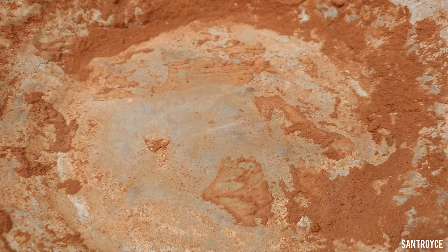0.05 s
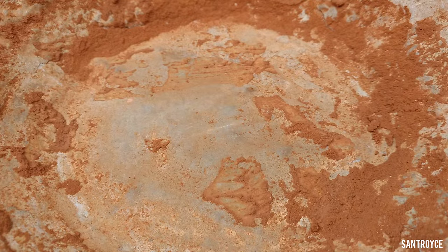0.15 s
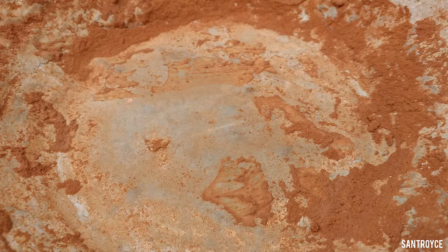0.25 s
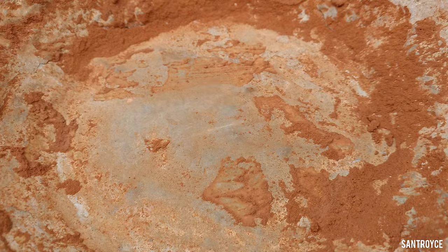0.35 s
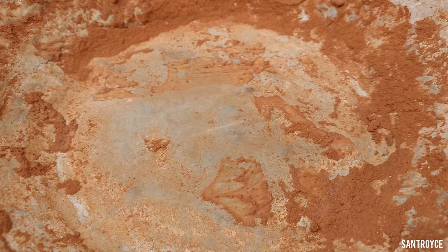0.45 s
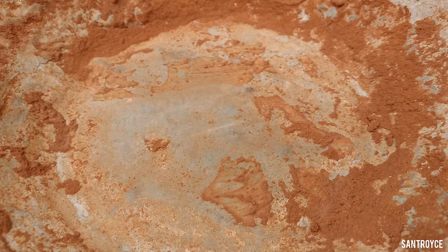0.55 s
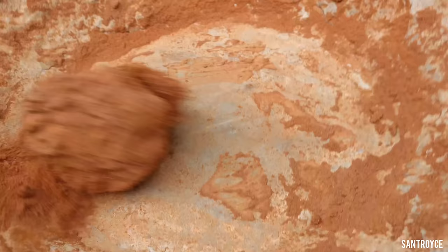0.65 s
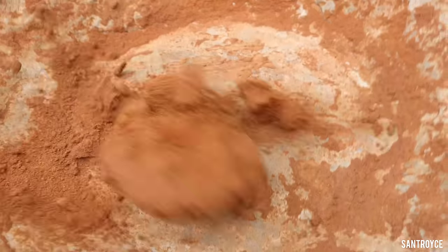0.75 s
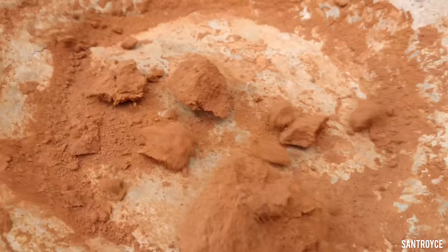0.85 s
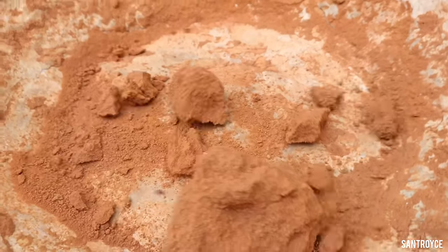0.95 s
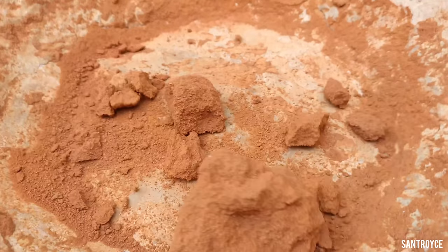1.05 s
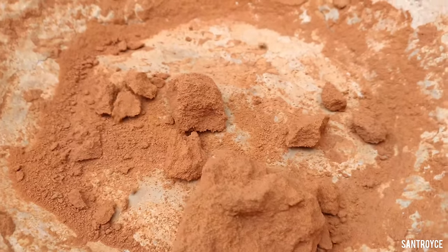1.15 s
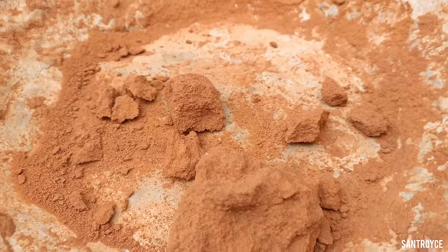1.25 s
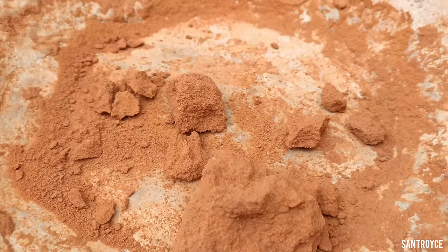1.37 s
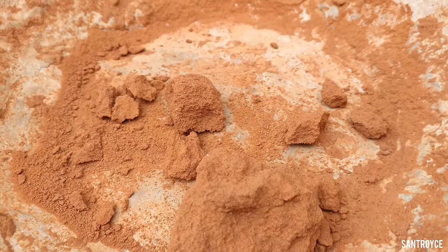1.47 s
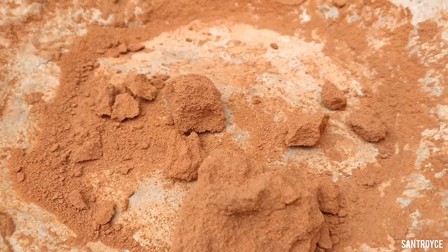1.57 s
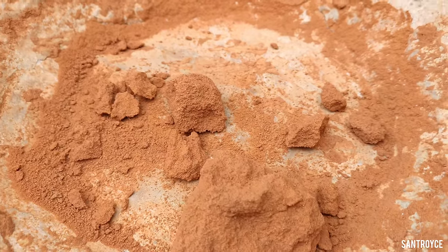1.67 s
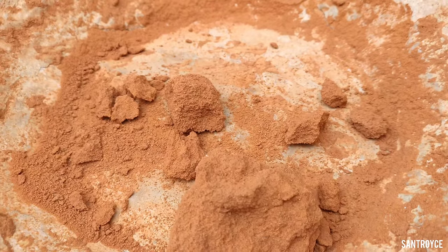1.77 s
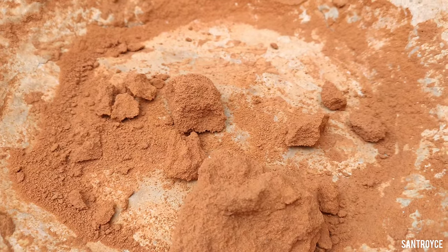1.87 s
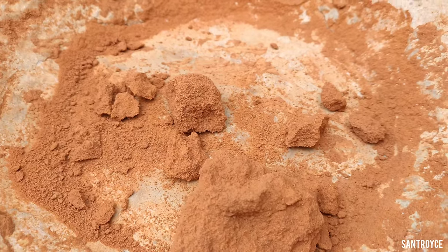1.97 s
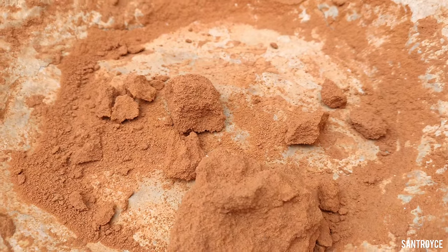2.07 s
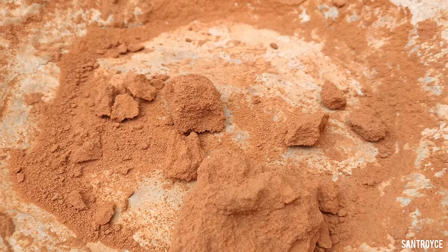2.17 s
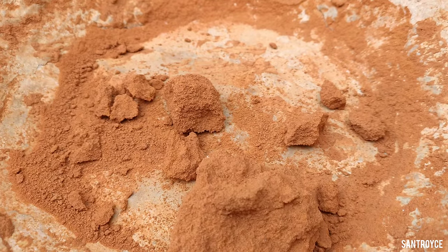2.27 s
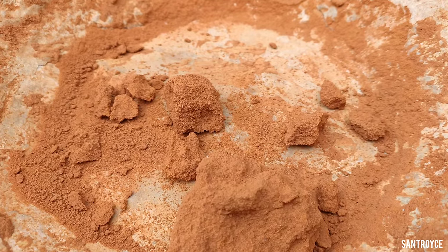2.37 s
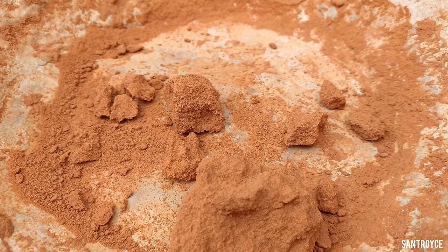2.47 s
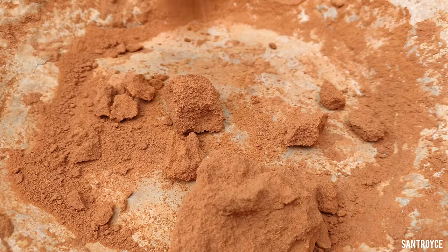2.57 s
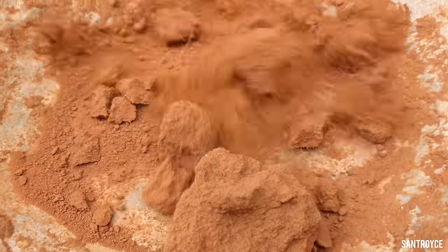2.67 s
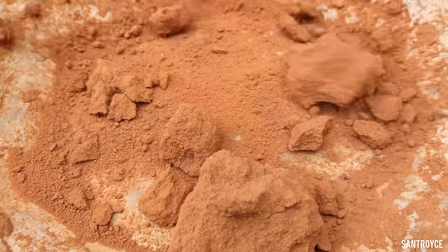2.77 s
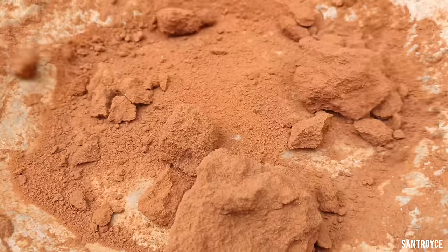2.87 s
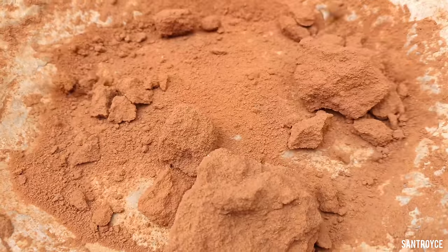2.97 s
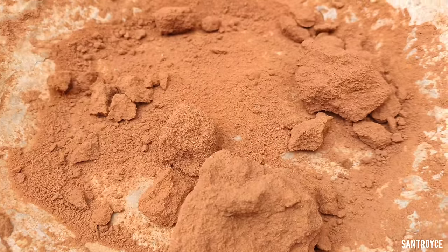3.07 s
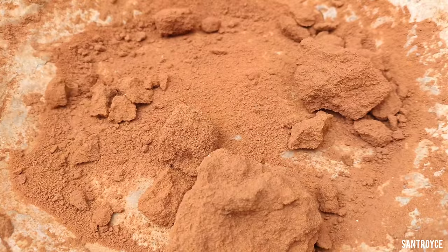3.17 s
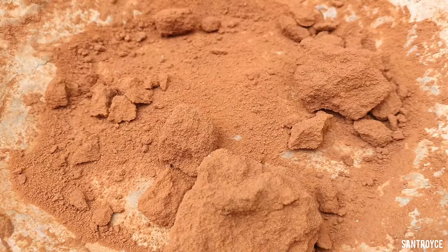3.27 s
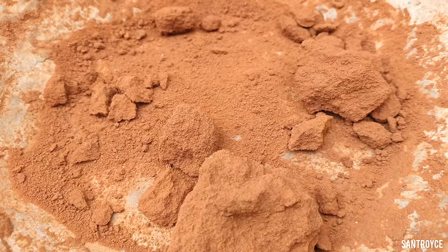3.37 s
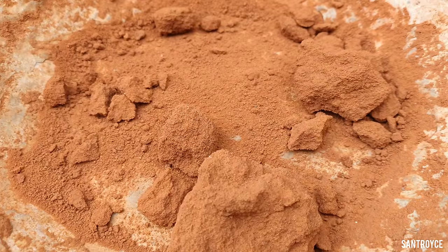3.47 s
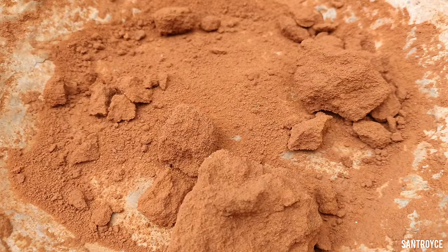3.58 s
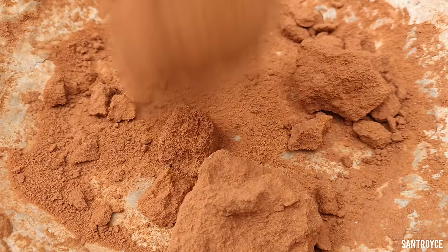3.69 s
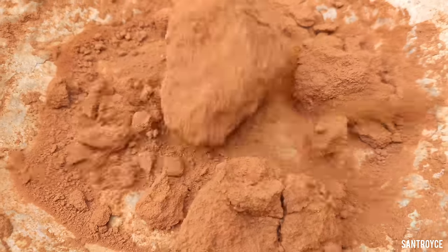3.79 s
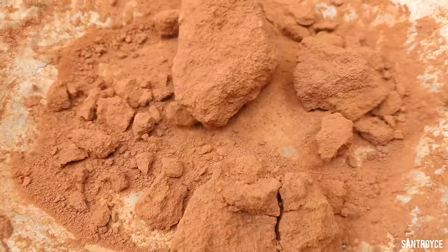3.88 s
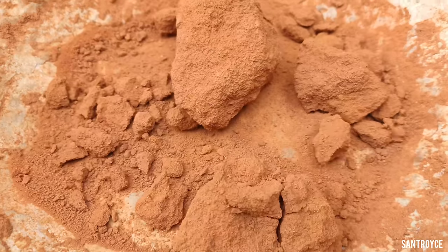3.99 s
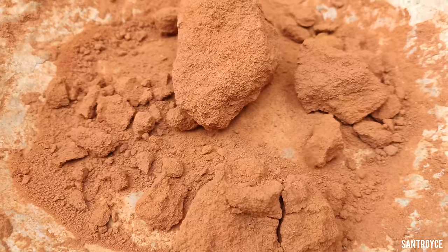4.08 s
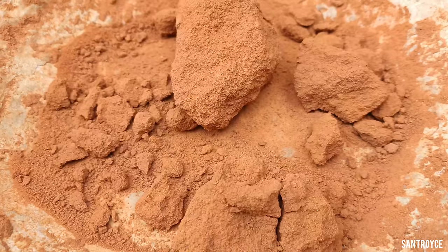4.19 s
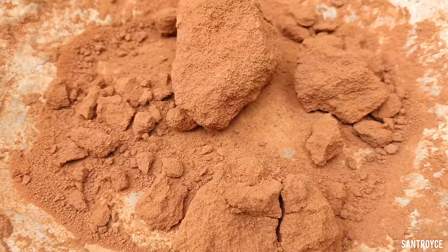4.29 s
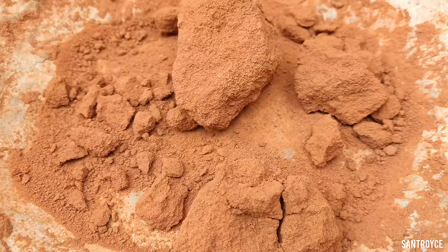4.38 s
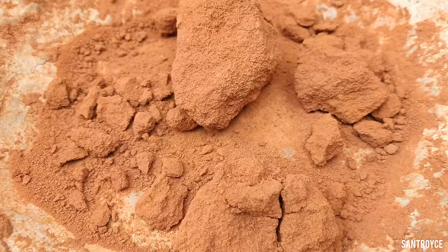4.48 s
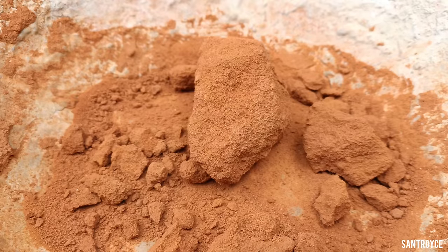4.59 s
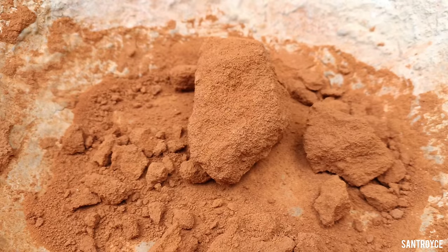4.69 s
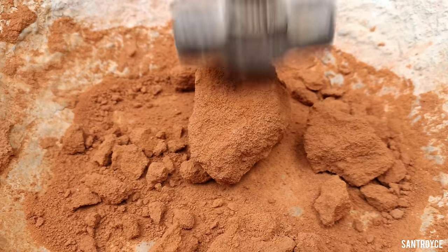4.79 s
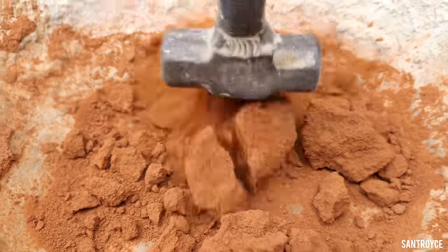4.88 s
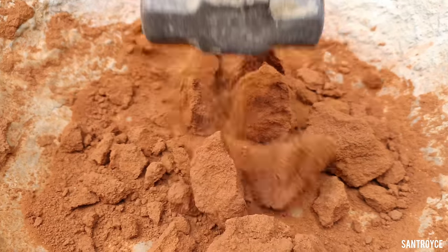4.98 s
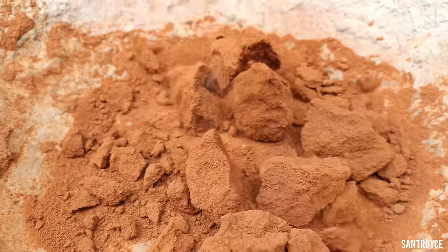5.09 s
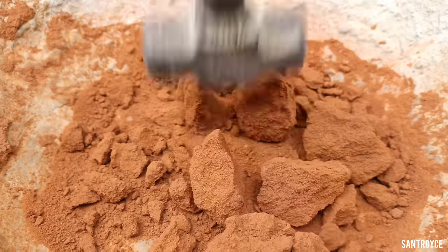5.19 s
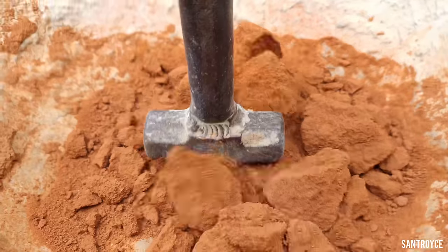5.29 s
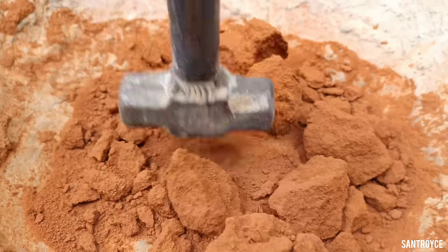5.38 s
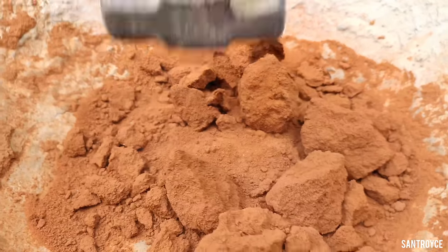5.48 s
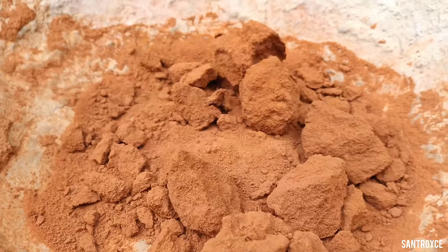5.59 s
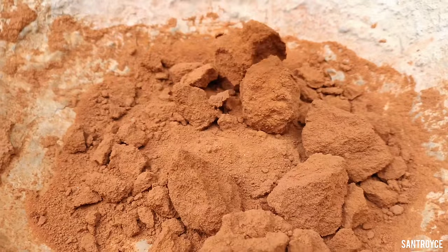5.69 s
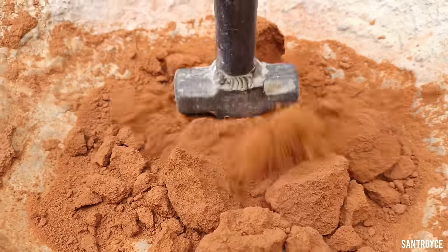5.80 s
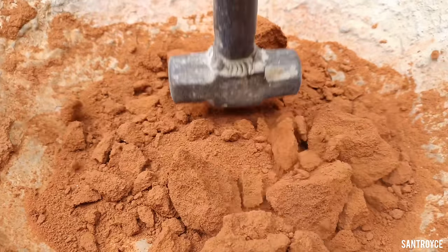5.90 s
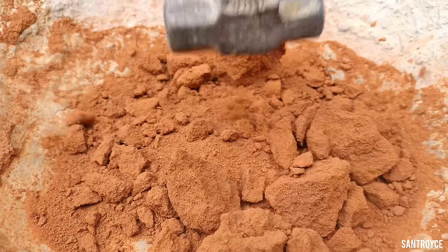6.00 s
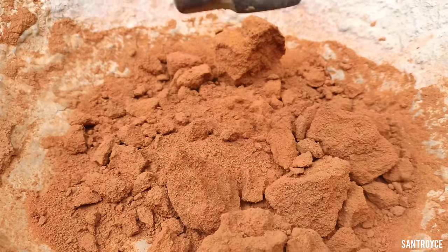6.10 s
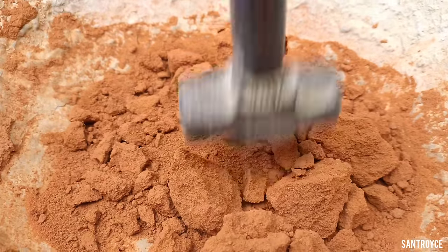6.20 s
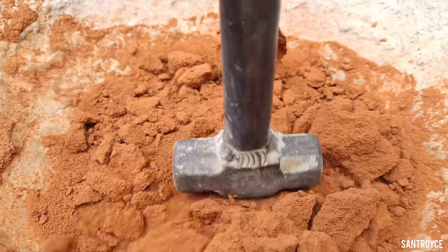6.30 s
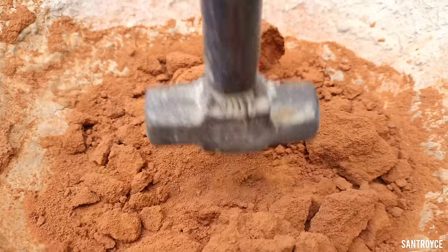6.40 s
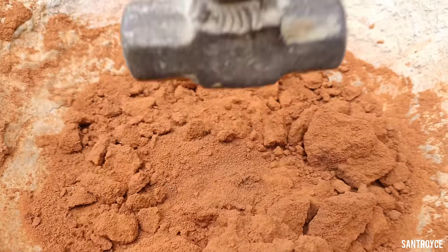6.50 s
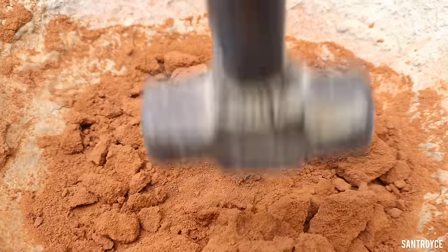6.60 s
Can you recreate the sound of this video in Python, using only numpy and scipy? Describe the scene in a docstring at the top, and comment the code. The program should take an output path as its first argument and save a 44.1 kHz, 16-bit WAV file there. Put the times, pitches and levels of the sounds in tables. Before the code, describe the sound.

Quiet outdoor air with insects, distant traffic and a faint whistle opens the scene, heard close to the ground. At 0.75 s a dry clay lump hits stone with a hard, brittle crack, scattering grains; pieces bump and rock with low hollow thumps until about 1.95 s. From about 0.75 to 2 s a songbird repeats a rapid, bright, echoing trill nine times. The air then turns quieter, with faint coos and a very low hum. Another lump smacks down at 2.7 s, spilling grit, and a heavier one at 3.8 s with a low heave. A second bird gives sliding whistles around 3.7 and 4.2-4.4 s. Hammer blows crush the clay at about 4.95, 5.35, 5.87 and 6.35 s: dull, cushioned crunches with small cracks, knocks and hissing powder, fading by 6.65 s. The background dips very briefly four times.

```python
"""Insects and distant traffic lie under faint whistles and coos; the level dips briefly four times.
Lumps of dry clay, sums of slab modes driven by noisy cracks, drop on stone and rock to rest as a
songbird trills nine times in echoing sines. Quieter air and a low hum take over; hammer blows crush
the clay, amid small cracks and hissing powder made of random grains, with some low heaves.
Amid the blows a second bird whistles gliding sines, the rising ones rich in overtones."""
import sys
import numpy as np
from scipy import signal
from scipy.fft import rfft, irfft, next_fast_len
from scipy.io import wavfile
from scipy.ndimage import uniform_filter1d

SR = 44100
rng = np.random.default_rng(int(sys.argv[2]) if len(sys.argv) > 2 else 0)


def master(y):
    """Save y as 16-bit WAV."""
    cut = np.clip(np.atleast_2d(y).T, -1, 1)
    pcm = np.round(cut * 32767)  # scale
    wavfile.write(sys.argv[1], SR, pcm.astype(np.int16))


N = 293265

# slab modes: pitch_hz, level_db, t60_s (at damping 1)
SLAB_MODES = [(705, -14, .05), (825, -11, .07), (915, 0, .085), (1000, -16, .04), (1110, -13, .04),
              (1390, -18, .05)]
# spectrum of the brittle top of cracks and grains: freq_hz, level_db
GRIT_SPECTRUM = [(1500, -43), (2600, -12), (9200, -9), (10000, -11), (11900, -4.5), (15400, -13),
                 (16300, -27)]
LEAD_S = .012  # soft noisy onset before the peak
CUSHIONED_FROM_S = 4.9  # later impacts land on a heap of powder


def amp(db):
    """Decibels to amplitude."""
    return 10 ** (np.asarray(db) / 20)


def evened(x):
    """Scales x to an rms of 1."""
    return x / np.sqrt(np.mean(x ** 2) + 1e-20)


def read(points, hz):
    """Interpolates a (frequency, value) table over log frequency."""
    f, value = np.transpose(points)
    return np.interp(np.log(hz + 1), np.log(f + 1), value)


def add(mix, start_s, sound):
    """Adds a sound into the mix, cut at the end of the mix."""
    part = mix[round(start_s * SR):][:len(sound)]
    part += sound[:len(part)]


def coloured(x, spectrum):
    """Shapes x by a spectrum in dB."""
    size = next_fast_len(len(x))
    gain = amp(read(spectrum, np.fft.rfftfreq(size, 1 / SR)))
    return irfft(rfft(x, size) * gain, size)[:len(x)]


def ringing(modes, damping=0.71, contact_ms=.05):
    """Impulse response of decaying modes; damping divides t60, a longer contact rounds off the treble."""
    t = np.arange(5000) / SR
    ring = sum(amp(db - 60 * damping * t / t60_s) * np.sin(2 * np.pi * hz * t) for hz, db, t60_s in modes)
    contact = np.hanning(int(contact_ms * SR / 1000) + 3)
    return np.convolve(ring, contact / contact.sum())[:len(t)]


def air(spectrum, curve, patchy_db, same):
    """Random short-time spectra with drifting patches, on a level curve; same = left-right correlation."""
    frames, hz = N // 256 + 5, np.fft.rfftfreq(1024, 1 / SR)
    a, b, c, d, patches = rng.standard_normal((frames, 513, 5)).T
    patches = uniform_filter1d(patches, size=8, axis=0)
    patches = evened(uniform_filter1d(patches, size=8, axis=1))
    left, other = a + 1j * b, c + 1j * d
    z = np.array([left, same * left + np.sqrt(1 - same ** 2) * other])
    z *= amp(read(spectrum, hz)[:, None] + patchy_db * patches)
    noise = evened(signal.istft(z, nperseg=1024, noverlap=768)[1][:, :N])
    s, db, pan_db = np.transpose(curve)
    t = np.arange(N) / SR
    side_db = np.outer([.5, -.5], np.interp(t, s, pan_db))
    level = amp(np.interp(t, s, db) + side_db) * (t >= s[0]) * (t <= s[-1])
    return level * noise


def background():
    """Insects and traffic give way to a quieter, wider air; each is spectrally shaped noise."""
    # insects and traffic: freq_hz, level_db
    garden = [(24, -42), (40, -8.5), (71, 3), (270, 1.5), (550, -5), (758, -10), (1350, -17), (3700, -20.5),
              (4330, -6), (4900, -23), (6940, -16.5), (9860, -27.5), (16300, -45.5)]
    # time_s, level_db, left_right_db
    garden_curve = [(0, -44, 0), (.38, -42.5, 0), (.42, -47.5, 0.5), (1.901, -45, 3), (2.1, -50.5, 3),
                    (2.249, -77.5, 6)]
    # quieter air: freq_hz, level_db
    yard = [(25, -41), (60, -4.5), (80, 4.5), (110, -20.5), (190, -8.5), (270, 2), (400, -20.5),
            (1000, -27), (3000, -30), (4500, -40), (12000, -38), (16400, -44.5)]
    # time_s, level_db, left_right_db
    yard_curve = [(2.1, -52.5, 2.5), (2.498, -52.5, 0), (3.202, -60, 0), (3.6, -53.5, 0), (4.4, -56, 1.5),
                  (4.597, -52, 0.5), (6.65, -55.5, 2.5)]
    early = air(garden, garden_curve, patchy_db=1.2, same=0.98)
    return early + air(yard, yard_curve, patchy_db=3.5, same=0.24)


def whistle(s, hz, db, overtones_db=(0,), wobble=0.):
    """A near sine that follows pitch and level curves; wobble is the rms share of pitch."""
    t = np.arange(s[0], s[-1], 1 / SR)
    pitch_hz = np.interp(t, s, hz)
    drift = 1 + wobble * evened(uniform_filter1d(rng.standard_normal(len(t)), size=200))
    phase = 2 * np.pi * (np.cumsum(pitch_hz * drift) / SR + rng.random())
    waver = evened(uniform_filter1d(rng.standard_normal(len(t)), size=300))
    level_db = np.interp(t, s, db) + 120 * wobble * waver
    strain_db = 63.0 * np.log2(pitch_hz / 4000)  # overtones grow with pitch
    tone = amp(overtones_db[0]) * np.sin(phase)
    if hz[-1] > hz[0]:  # only rising notes have overtones
        for k, overtone_db in enumerate(overtones_db[1:], 2):
            tone = tone + amp(overtone_db + strain_db) * np.sin(k * phase)
    taper = signal.windows.tukey(len(t), min(.15, .1 * SR / len(t)))
    return np.sqrt(2) * amp(level_db) * tone * taper


def garden_echo(x, t60_s, wet_db):
    """One clear bounce, then a diffuse tail from walls and trees, different left and right."""
    t = np.arange(SR // 2) / SR
    tail = rng.standard_normal((3, len(t))) * amp(-60 * t / t60_s) * (t > .012)
    tail = tail[0] + .5 * tail[1:]
    tail *= amp(wet_db) / np.linalg.norm(tail[0])
    tail[:, 0] = 1  # direct sound
    tail[:, round(.011 * SR)] = amp(-13.5)  # bounce
    return signal.fftconvolve(x[None], tail, axes=1)[:, :N]


def faint_tones():
    """Faint whistles and coos, a held tone echoing the second bird's glide, a distant vehicle's drone near 300
    Hz, and a low hum: wavering sines."""
    # start_s, length_s, from_hz, to_hz, level_db, fade_db
    calls = [(0.297, 0.47, 1943, 1992, -58, -1.5), (1.727, 0.11, 1515, 2690, -63.5, 1),
             (1.982, 0.074, 1560, 2540, -64.5, 1), (2.059, 0.078, 2580, 2180, -58, -19),
             (3.382, 0.045, 1150, 1109, -64.5, 2.5), (4.308, 0.046, 4130, 4466, -62, -6),
             (4.352, 0.077, 4400, 4340, -66, -10), (1.828, 0.035, 2530, 2360, -49.5, 4),
             (2.262, .075, 305.6, 279, -43.5, 5.5), (2.406, 0.06, 274, 294.4, -40, -15.5),
             (2.463, 0.28, 3090, 2925, -74, 2), (3.43, 0.061, 312, 262, -41.5, -5),
             (4.536, 0.36, 294, 306, -51, -11.5)]
    # hum: time_s, level_db
    hum_curve = [(2.3, -72.5), (5.798, -63), (6.001, -59.5), (6.65, -56)]
    hum_hz = 80
    out = np.zeros(N)
    for s, length_s, from_hz, to_hz, db, fade_db in calls:
        add(out, s, whistle([0, length_s], [from_hz, to_hz], [db, db + fade_db], wobble=.011))
    s, db = np.transpose(hum_curve)
    add(out, s[0], whistle(s, hum_hz + 0 * s, db, wobble=0.013))
    return out * amp([[-3.0], [3.0]])


def second_bird():
    """Echoing whistled glides, the rising ones rich in overtones."""
    # one list per glide: time_s, pitch_hz, level_db
    glides = [
        [(3.69, 1890, -75), (3.715, 2630, -50), (3.738, 3040, -64.5), (3.767, 3390, -49), (3.785, 3800, -56),
         (3.81, 4230, -83)],
        [(4.178, 1940, -72), (4.205, 2590, -50.5), (4.22, 2811, -59.5), (4.257, 3500, -48),
         (4.301, 3730, -52.5), (4.32, 3960, -57), (4.345, 3800, -69)],
        [(4.351, 4400, -66), (4.367, 3680, -52), (4.397, 2470, -53.5), (4.42, 1623, -57)],
    ]
    # levels of the fundamental and its overtones: level_db
    overtones_db = [3, -9, -9.5, -15.5]
    out = np.zeros(N)
    for rows in glides:
        add(out, rows[0][0], whistle(*np.transpose(rows), overtones_db, wobble=.016))
    return garden_echo(out, 0.14, -9.0) * amp([[-1.5], [1.5]])


def songbird():
    """One four-note syllable of gliding sines, repeated with echo."""
    # time of the low note and level per syllable: low_note_s, level_db
    trill = [(0.7928, -34.5), (0.933, -27.5), (1.073, -27), (1.2131, -26), (1.353, -26.5), (1.495, -26.5),
             (1.6367, -27), (1.7795, -27.5), (1.93, -30)]
    # one list per note: ms_after_low_note, pitch_hz, level_db
    syllable = [
        [(-50.5, 7150, -12), (-41.5, 7030, -7.5), (-37, 6380, -29.5)],
        [(-6, 3250, -11), (0, 3550, -2), (6.5, 3550, 2.5), (12.5, 2920, -14)],
        [(10.8, 4150, -1.5), (18.2, 4450, 4.5), (25.3, 4816, 8.5), (29.5, 5480, -1), (35, 5870, -13.5)],
        [(33.8, 4650, -4.5), (35.7, 4250, 6), (47, 4080, 2), (63.5, 4000, -4.5), (70.5, 4150, -5)],
    ]
    out = np.zeros(N)
    for i, (s, db) in enumerate(trill):
        for note in syllable[i == 0:]:  # the first syllable lacks its high lead-in
            ms, hz, note_db = np.transpose(note)
            add(out, s + ms[0] / 1000, whistle(ms / 1000, hz, note_db + db, wobble=0.004))
    return garden_echo(out, 0.48, -12.0)


def heave():
    """The slab heaves under the heaviest blows: a low damped mode pushed softly."""
    # start_s, level_db
    pushes = [(2.698, -40), (3.815, -25), (5.376, -28.5)]
    push_hz, push_t60_s = 74, 0.16  # t60 at damping 1
    out = np.zeros(N)
    for s, db in pushes:
        add(out, s, ringing([(push_hz, db, push_t60_s)], 0.7, contact_ms=10.0))
    return out


def shard(draw, centre_hz, octaves, t60_s, fall_db=-2.5):
    """A small piece has its own short modes, scattered round a centre, the higher ones weaker."""
    above = octaves * np.clip(draw, -2.2, 2.2)
    return ringing([(centre_hz * 2 ** o, fall_db * o, t60_s) for o in above], contact_ms=.15)


def powder():
    """Thousands of grains a second: fine ones hiss, coarser ones tap the slab."""
    # loose powder spilling after a blow: start_s, level_db, t60_s
    spills = [(0.757, -41, 1), (0.876, -39, 0.38), (2.7, -37.5, 0.29), (2.85, -60.5, 0.37),
              (3.818, -42.5, 0.37), (3.909, -45.5, 0.2), (3.96, -48.5, 0.17), (4.951, -42.5, 0.6),
              (5.14, -43.5, 0.18), (5.347, -27.5, 0.19), (5.48, -52.5, 0.44), (5.869, -37, 0.22),
              (5.96, -59, 0.95), (6.351, -37, 0.21)]
    coarse_db = 7.5  # coarse grains over fine ones
    t = np.arange(N) / SR
    clumps = evened(uniform_filter1d(rng.standard_normal(N), size=300))
    clumps = amp(4 * np.clip(clumps, -2.5, 1.5))
    size = amp(3 * np.minimum(rng.exponential(1, N), 5)) * rng.choice([-1., 1.], N) * clumps
    fine = evened(coloured(size * (rng.random(N) < 7000 / SR), GRIT_SPECTRUM))
    kind = rng.integers(0, SR // 40, N)  # each kind of grain lands about 40 times a second
    coarse = np.zeros(N)
    for k, draw in enumerate(rng.standard_normal((36, 2))):
        piece = shard(draw, 2500, 0.74, 0.026) + amp(-11.5) * ringing(SLAB_MODES, 3.2)
        coarse += signal.oaconvolve(size * (kind == k), piece[:SR // 25])[:N]
    # grains keep the uncovered slab singing, as strong as the coarse taps
    singing = evened(signal.oaconvolve(size * (kind < 10), ringing(SLAB_MODES, .8))[:N])
    coarse = evened(coarse) + singing * (t < CUSHIONED_FROM_S)
    level = np.zeros(N)
    u = t[:SR]
    for s, db, t60_s in spills:
        flow = (1 - np.exp(-u / 0.032)) * amp(-60 * (u / t60_s) ** 1.03)
        add(level, s, amp(db) * flow)
    return level * (fine + amp(coarse_db) * coarse)


def cracks(draw, fade_ms, spread_db=6.5):
    """Noise swells briefly, then dies away in uneven cracks; fade_ms is the decay constant."""
    u = (np.arange(draw.shape[1]) / SR - LEAD_S) / (fade_ms / 1000)
    shape = np.where(u < 0, .65 * np.exp(3 * u), np.exp(-u))
    uneven = 3.94 * uniform_filter1d(draw[1], size=16)  # 3.94 restores about unit spread
    return draw[0] * amp(spread_db * uneven) * shape


def struck(force, body, db):
    """The force rings a body; db is the rms of the first 30 ms."""
    sound = signal.fftconvolve(force, body)
    return amp(db) * sound / np.sqrt(np.mean(sound[:round(.03 * SR)] ** 2) + 1e-20)


def grit(force, peak_db, uneven_db=0):
    """The brittle top of the cracks; uneven_db colours one piece in its own way."""
    spectrum = np.array(GRIT_SPECTRUM, float)
    spectrum[:, 1] += uneven_db
    sound = coloured(force, spectrum)
    return amp(peak_db) * sound / abs(sound).max()


def rocking():
    """Big lumps rock to rest: damped thumps on a soft contact, each ringing the slab."""
    # start_s, thud_db, pitch_hz, slab_ring_db
    rocks = [(0.9, -28.5, 305, -35.5), (0.986, -27, 302, -32.5), (1.01, -21, 256, -53),
             (1.098, -29.5, 242, -44.5), (1.149, -26.5, 316, -42), (1.263, -15.5, 258, -51),
             (1.306, -27.5, 209, -43), (1.399, -20.5, 287, -41), (1.451, -30.5, 245, -60),
             (1.534, -21.5, 252, -59.5), (1.606, -27, 191, -46.5), (1.671, -28.5, 208, -48.5),
             (1.814, -26.5, 177, -58.5), (1.898, -29, 194, -50), (1.947, -28.5, 211, -49.5),
             (5.943, -32.5, 262, -60)]
    out, slab = np.zeros(N), ringing(SLAB_MODES, 1.436, contact_ms=0.6)
    draws = rng.standard_normal((len(rocks), 2, 1400))
    for (s, thud_db, hz, ring_db), draw in zip(rocks, draws):
        add(out, s, ringing([(hz, thud_db, .032)], contact_ms=1.1))
        add(out, s - LEAD_S, struck(cracks(draw, 7.2), slab, ring_db))
    return out


def small_cracks():
    """Small cracks, some within blows: a short crack excites a pitched knock and unevenly coloured grit."""
    # peak_s, grit_peak_db, knock_over_grit_db, knock_hz
    knocks = [(0.7528, -15, 0, 2574), (0.9768, -25.5, -25, 885), (1.1988, -24, -24, 950),
              (1.307, -26.5, -20.5, 1010), (1.4725, -30, -15.5, 970), (2.849, -32, -25, 1478),
              (2.8893, -40, -17.5, 990), (3.003, -44.5, -18, 3450), (3.0386, -44.5, -16, 3830),
              (3.916, -31, -8.5, 813), (3.9252, -29, -20, 2480), (3.9593, -33, -8.5, 815),
              (3.977, -29, -24, 2470), (4.065, -36.5, -20.5, 896), (4.954, -14.5, -33.5, 943),
              (5.026, -25, -16, 2150), (5.1578, -24, -20, 900), (5.203, -26.5, -22, 2360),
              (5.214, -38.5, -23, 2314), (5.392, -22, -29, 2380), (5.4068, -28, -14, 890),
              (5.499, -20, -18.5, 1050), (5.51, -30, -22, 1570), (5.53, -34, -25, 2420),
              (5.6157, -19.5, -24, 2400), (5.7254, -45, -20.5, 967), (5.91, -27.5, -37, 890),
              (5.978, -27.5, -25, 2150), (6.013, -31, -24, 2470), (6.032, -35, -17, 2600),
              (6.0737, -34.5, -22, 3200), (6.156, -27, -22.5, 1210), (6.428, -41, 2.5, 2510),
              (6.4486, -59, 11.5, 2550)]
    # modes of a knock: multiple_of_pitch, level_db
    piece = [(1, 3), (1.159, 1), (1.361, -6), (2.101, -19)]
    bare_ms, cushioned_ms, t60_s = 2.2, 4., .014  # t60 at damping 1
    out = np.zeros(N)
    draws = rng.standard_normal((len(knocks), 3, 1400))
    for (s, grit_db, knock_db, hz), draw in zip(knocks, draws):
        force = cracks(draw, cushioned_ms if s > CUSHIONED_FROM_S else bare_ms)
        modes = [(hz * k * (1 + 0.04 * d), db, t60_s) for (k, db), d in zip(piece, draw[2])]
        add(out, s - LEAD_S, struck(force, ringing(modes, contact_ms=0.17), grit_db + knock_db))
        add(out, s - LEAD_S, grit(force, grit_db, 4 * draw[2, -len(GRIT_SPECTRUM):]))
    return out


def blows():
    """Lumps hit or break: cracks drive thud and slab modes, a dull clack and brittle grit."""
    # peak_s, slab_ring_db, grit_over_ring_db (brittleness), thud_over_ring_db (heft)
    hits = [(0.7526, -17, 6, -3.5), (0.768, -24.5, -24, -10.5), (0.781, -29, -2, -4),
            (0.8135, -34, 11, -10), (0.9284, -30.5, 14.5, -4), (1.0437, -36.5, 7.5, -3),
            (2.6902, -21, -6, -16), (2.6986, -15, -4, -9), (2.715, -15.5, -32, -14.5), (3.8144, -15, 5, -6),
            (3.828, -30.5, 0, 10.5), (3.857, -36.5, 11, 11), (4.9386, -35, 12, 14), (4.948, -30, 16.5, 1),
            (4.9711, -28, -50, -4), (5.048, -46.5, 15, 12.5), (5.342, -34.5, 5.5, -25),
            (5.363, -29, -10, -9.5), (5.3811, -26, -33, -12), (5.3924, -46, 2, 14), (5.475, -40, 6.5, 10.5),
            (5.69, -38, -51.5, -3.5), (5.8597, -36.5, 12.5, -22), (5.869, -26.5, 1.5, -21.5),
            (5.8831, -32, 11, -14), (6.338, -35.5, 11.5, -16), (6.3463, -26.5, 11, -30),
            (6.3624, -29, -13, -3)]
    # low modes of slab and clay: pitch_hz, level_db, t60_s (at damping 1)
    thud_modes = [(224.5, 1, 0.11), (279, 4, 0.089), (381, 6.5, 0.069), (446, 5, 0.07)]
    # dull clack of breaking clay: freq_hz, level_db
    clack_spectrum = [(900, -42.5), (1500, 4), (2400, -3), (3200, -3), (4500, -12.5), (7000, -34)]
    clack_db, clack_share = -8.5, 0.3  # clack over ring; how much it follows brittleness
    crush_ms, packed_ms, drop_ms = 6.9, 9.9, 3.5  # packed powder gives way slowly, a drop abruptly
    packed_from_s = 5.8
    abrupt_ring_db, abrupt_brittle_db = -24, -15  # a drop is abrupt above both
    out = np.zeros(N)
    clack = coloured(signal.unit_impulse(512, 64), clack_spectrum)
    draws = rng.standard_normal((len(hits), 2, 3600))
    for (s, ring_db, brittle_db, heft_db), draw in zip(hits, draws):
        if s > packed_from_s:
            force = cracks(draw, packed_ms)
        elif ring_db > abrupt_ring_db and brittle_db > abrupt_brittle_db:
            force = cracks(draw, drop_ms)
        else:
            force = cracks(draw, crush_ms)
        damping = 3.0 if s > CUSHIONED_FROM_S else 1.
        detune = .06 * (damping - 1) * draw[1]  # loose lumps detune the ring
        slab_modes = [(hz * (1 + d), db, t60_s) for (hz, db, t60_s), d in zip(SLAB_MODES, detune)]
        thud = ringing(thud_modes, damping, contact_ms=0.18)
        add(out, s - LEAD_S, struck(force, thud, ring_db + heft_db))
        add(out, s - LEAD_S, struck(force, ringing(slab_modes, damping, contact_ms=0.51), ring_db))
        add(out, s - LEAD_S, struck(force, clack, ring_db + clack_db + clack_share * brittle_db))
        add(out, s - LEAD_S, grit(force, ring_db + brittle_db))
    return out


def clay():
    """Blows, small cracks and rocking lumps; small lumps radiate little bass."""
    highpass = signal.butter(2, 185, "high", fs=SR, output="sos")
    return signal.sosfilt(highpass, blows() + small_cracks() + rocking())


def two_ports(common, unlike):
    """Heard close up, the heap differs left and right: a lean per frequency plus an unlike part."""
    # freq_hz, share_toward_left
    lean = [(100, 0.093), (400, -0.098), (1000, -0.22), (2500, -0.3), (6000, -0.62), (12000, 0.42)]
    # unlike part: freq_hz, level_db
    spread = [(100, -9), (1000, -3), (4000, -4), (12000, -1)]
    side = coloured(unlike, spread)
    side += irfft(rfft(common) * read(lean, np.fft.rfftfreq(N, 1 / SR)), N)
    return np.array([common + side, common - side])


def heap():
    """Clay, powder and heaves at the place where the heap lies."""
    # time_s, left_right_db
    heap_pan = [(1, 2.5), (2.701, 1.5), (3.8, 2.5), (5, 4.5)]
    pan_db = np.interp(np.arange(N) / SR, *np.transpose(heap_pan))
    sound = two_ports(clay() + powder() + heave(), clay() + powder())
    return sound * amp(np.outer([.5, -.5], pan_db))


def scene():
    """All sources together."""
    return background() + faint_tones() + second_bird() + songbird() + heap()


def record(dry):
    """Bass roll-off, brief level dips, clipping at full scale, then the band limit."""
    # brief dips: centre_s, length_ms, depth_db
    dips = [(0.397, 29, -15), (2.257, 6.9, -22.5), (3.424, 6.4, -22.5), (4.523, 5.7, -31)]
    edge_hz = 16400
    t = np.arange(N) / SR
    thinned = signal.sosfilt(signal.butter(2, 55, "high", fs=SR, output="sos"), dry)
    # full depth over the middle half of each dip
    dips_db = sum(db * np.clip(2 - abs(t - s) / (ms / 4000), 0, 1) for s, ms, db in dips)
    clipped = np.clip(thinned * amp(dips_db), -1, 1)
    lowpass = signal.firwin(511, edge_hz, window=("kaiser", 9), fs=SR)
    return signal.oaconvolve(clipped, lowpass[None], "same")


dry = scene()
out = record(dry)
master(out)
```